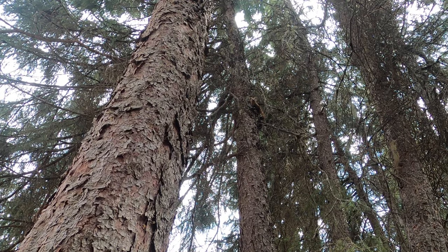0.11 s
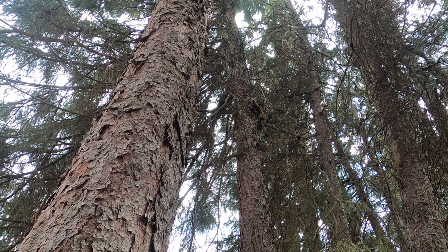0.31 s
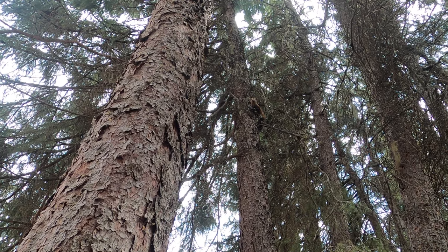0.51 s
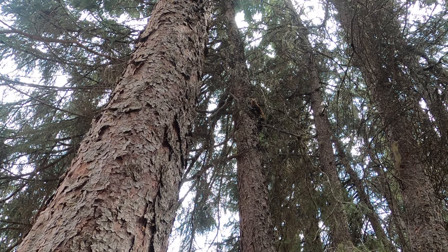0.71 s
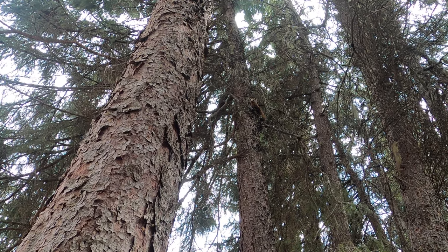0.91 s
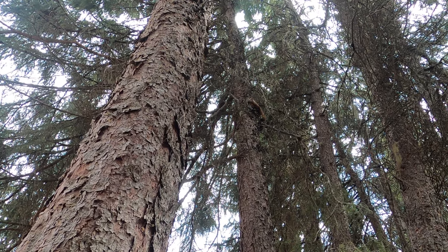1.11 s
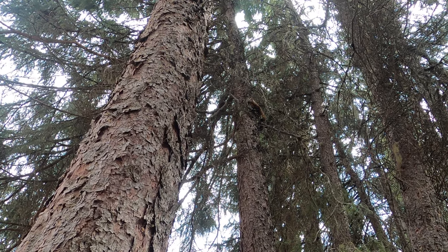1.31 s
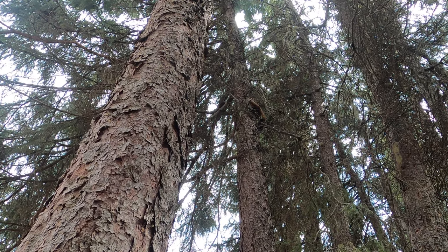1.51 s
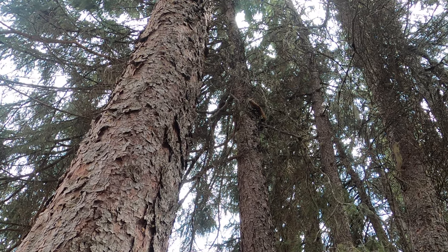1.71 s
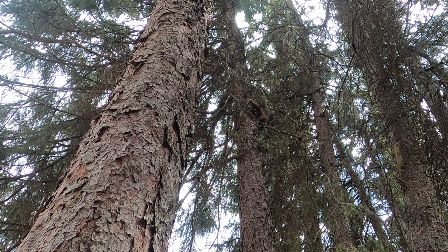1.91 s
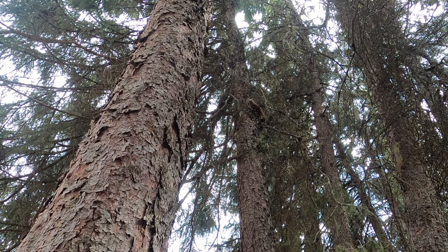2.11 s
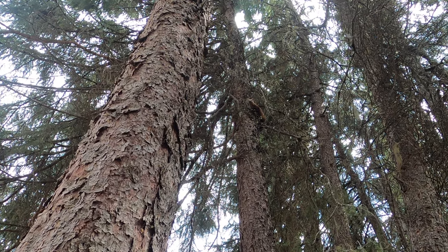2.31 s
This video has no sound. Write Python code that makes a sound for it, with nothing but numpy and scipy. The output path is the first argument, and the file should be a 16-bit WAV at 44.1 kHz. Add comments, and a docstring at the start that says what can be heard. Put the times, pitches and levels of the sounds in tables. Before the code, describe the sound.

Wind buffets the microphone in low, irregular rumbles, mostly on the right, building from about 0.3 seconds, strongest from 0.8 to 1.8, and easing after a last gust near 2.1. A faint steady hiss of conifers and soft needle rustles lies behind. A dry twig ticks at 0.3 seconds, with fainter ticks later. A small bird chips quietly near 0.5 and 1.7 seconds.

```python
"""Wind on a microphone among conifers

Gusts carry eddies past the two ports of a microphone, mostly the right one: low, irregular rumbles.
Behind them wind hisses steadily in tall conifers and nearer needles brush in soft, sizzling swells.
A few dry twigs or bits of bark tick, and a small bird chips twice among the trunks."""
import sys
import numpy as np
from scipy import signal
from scipy.fft import rfft, irfft, next_fast_len
from scipy.io import wavfile
from scipy.ndimage import uniform_filter1d, map_coordinates

SR = 44100
rng = np.random.default_rng(int(sys.argv[2]) if len(sys.argv) > 2 else 0)


def persist_wave(psi):
    """Save psi, clipped to +-1, as 16-bit WAV."""
    counts = np.round(np.clip(psi, -1, 1) * 32767).astype(np.int16)
    wavfile.write(sys.argv[1], SR, np.atleast_2d(counts).T)


N = 103635

# Spectrum of needle sizzle and twig crackle. Each row: frequency in Hz, relative density in dB.
CRACKLE_SPECTRUM = [(1500, -12), (4000, 5), (6500, 4), (9000, -3.5), (12000, -12.5), (13200, -21),
                    (14200, -31)]


def amp(db):
    """Decibels to gain."""
    return 10 ** (np.asarray(db) / 20)


def unit(x):
    """Scale to rms 1."""
    return x / np.sqrt(np.mean(x ** 2) + 1e-20)


def along(points, hz):
    """Interpolate (Hz, value) points on a log frequency axis."""
    knots_hz, values = np.transpose(points)
    return np.interp(np.log(hz + 1), np.log(knots_hz + 1), values)


def curve(points):
    """Interpolate (seconds, value) points at every sample."""
    return np.interp(np.arange(N) / SR, *np.transpose(points))


def wobble(rate_hz):
    """Smooth random curve, rate_hz knots a second."""
    knots = rng.standard_normal(int(N * rate_hz / SR) + 4)
    return map_coordinates(knots, [np.arange(N) * rate_hz / SR])


def filtered(x, response):
    """Zero-phase filter with gain response(hz)."""
    size = next_fast_len(N + SR // 2)
    return irfft(rfft(x, size) * response(np.fft.rfftfreq(size, 1 / SR)), size)[..., :N]


def noise(spectrum):
    """Two independent coloured noises of rms 1."""
    return unit(filtered(rng.standard_normal((2, N)), lambda hz: amp(along(spectrum, hz))))


def panned(pan_db):
    """Stereo gains of mean power 1; pan is left minus right."""
    gains = amp(np.array([[.5], [-.5]]) * pan_db)
    return gains / np.sqrt(np.mean(gains ** 2, axis=0))


def forest_echo(x, t60_s=.48, build_s=.015):
    """Trunks scatter sound into a diffuse tail that builds, then dies away."""
    t = np.arange(SR // 2) / SR
    tail = rng.standard_normal((2, len(t))) * amp(-60 * t / t60_s) * (1 - np.exp(-t / build_s))
    return signal.fftconvolve(x.mean(axis=0)[None], tail / np.linalg.norm(tail[0]), axes=1)[:, :N]


def conifers(level_db=-57.5, waver_db=.3):
    """Wind in the crowns: a steady, slightly wavering rush, wider in the treble."""
    # Each row: frequency in Hz, relative density in dB.
    spectrum = [(25, -8), (100, 3), (250, -9), (450, -9), (700, -6.5), (880, -7), (1050, -1), (1500, -1),
                (2100, -2.5), (3000, -7.5), (3700, -11.5), (4200, -14.5), (5200, -17.5), (7000, -28),
                (9000, -41.5), (14000, -70)]
    # Each row: frequency in Hz, left-right correlation.
    correlation = [(100, 0.93), (500, 0.69), (1200, 0.79), (2500, 0.65), (4500, 0.38), (9000, 0.11)]
    # Each row: frequency in Hz, pan in dB.
    pans = [(300, -2), (700, -1), (1400, 1.3), (2800, 3.5), (5000, -0.5), (9000, 1)]

    def mid_side_gains(hz):
        angle = np.arccos(along(correlation, hz)) / 2
        return np.array([np.cos(angle), np.sin(angle)])

    mid, side = filtered(noise(spectrum), mid_side_gains)
    crowns = unit(np.array([mid + side, mid - side])) * amp(level_db + waver_db * wobble(rate_hz=14))
    return filtered(crowns, lambda hz: panned(along(pans, hz)))


def needles(floor_db=-100.5, grain_db=3):
    """Needles on nearby branches brush together in soft, grainy swells."""
    # Each row: peak time in seconds, level in dB, width in seconds.
    rustles = [(.15, -75.5, .13), (.265, -70.5, 0.039), (.39, -78, 0.14), (0.619, -80, 0.087),
               (.81, -78.5, .05), (.97, -83, .05), (1.17, -79.5, .07), (1.6, -78, .06), (1.92, -88, 0.072),
               (2.249, -78, 0.069)]
    t = np.arange(N) / SR
    power = sum(amp(db) ** 2 * np.exp(-((t - peak_s) / width_s) ** 2) for peak_s, db, width_s in rustles)
    grain = amp(grain_db * np.array([wobble(rate_hz=600) for _ in range(2)]))
    return np.sqrt(amp(floor_db) ** 2 + power) * unit(noise(CRACKLE_SPECTRUM) * grain)


def twigs(hold_s=.001, crackle_t60_s=.019, echo_db=-10.5):
    """Dry twigs tick: milliseconds of crackle plus the ring of the wood."""
    # Each row: start in seconds, crackle level in dB, pan in dB, ring level in dB.
    ticks = [(0.264, -57.5, 15, -53), (.835, -67.5, 4.5, -82), (1.146, -75, -7, -99), (1.607, -67, 8, -86),
             (2.242, -69, 10, -87.5)]
    # Each row: frequency in Hz, dB relative to the ring level, T60 in seconds.
    modes = [(5170, -6, 0.028), (8770, -5.5, 0.016), (9000, -6.5, .016)]
    direct = np.zeros((2, N))
    for start_s, crackle_db, pan_db, ring_db in ticks:
        t = np.arange(N) / SR - start_s
        decay_s = np.maximum(t - hold_s, 0)
        crackle = noise(CRACKLE_SPECTRUM) * amp(crackle_db - 60 * decay_s / crackle_t60_s)
        ring = sum(amp(ring_db + db - 60 * decay_s / t60_s) * np.sin(2 * np.pi * hz * t)
                   for hz, db, t60_s in modes)
        direct += (crackle + ring) * (t > 0) * panned(pan_db)
    return direct + amp(echo_db) * forest_echo(direct)


def whistle(progress, hz):
    """Pure tone on a pitch curve, swelling and fading as progress runs from 0 to 1."""
    return np.sin(2 * np.pi * np.cumsum(hz) / SR) * np.sin(np.pi * progress)


def bird(note_s=.021, arch_hz=495, lead_s=.022, lead_db=-19.5):
    """Each chip: a thin rising slide, then a short arched note, echoed by the trunks."""
    # Each row: note start in seconds, level in dB, top pitch of the note in Hz.
    chips = [(.4630, -55.5, 3925), (1.6537, -54, 4000)]
    lead_from_hz, lead_to_hz = 4200, 7200
    t, song = np.arange(N) / SR, np.zeros(N)
    for start_s, db, top_hz in chips:
        note_progress = np.clip((t - start_s) / note_s, 0, 1)
        note = whistle(note_progress, top_hz - arch_hz * (2 * note_progress - 1) ** 2)
        lead_progress = np.clip((t - start_s) / lead_s + 1, 0, 1)
        lead = whistle(lead_progress, lead_from_hz + (lead_to_hz - lead_from_hz) * lead_progress)
        song += amp(db) * np.sqrt(2) * (note + amp(lead_db) * lead)
    direct = song * panned(pan_db=10.5)
    return direct + forest_echo(direct)


def eddies(speed, evenness=.35, mic_highpass_hz=30):
    """Frozen turbulence carried past one port: faster air makes faster pressure swings."""
    # Each row: frequency in Hz at speed 1, relative density in dB.
    spectrum = [(10, -14.5), (22, -4), (40, 1.5), (65, -1.5), (95, -4.5), (130, -11), (175, -19.5),
                (230, -30), (320, -49), (600, -93)]
    rumble_cutoff_hz = 223.4  # at speed 1; steep low-pass keeps the levelled rumble deep
    analytic = signal.hilbert(noise(spectrum)[0])
    pattern = analytic.real / (np.abs(analytic) + .3) ** evenness  # partly levels the envelope
    pattern = filtered(pattern, lambda hz: 1 / np.sqrt(1 + (hz / rumble_cutoff_hz) ** 16))
    pressure = map_coordinates(pattern, [np.cumsum(speed)], order=3, mode="mirror")
    return unit(filtered(pressure, lambda hz: hz ** 3 / np.sqrt(hz ** 6 + mic_highpass_hz ** 6)))


def buffeting(gain_db=1.5, speed_jitter=.16, lee_speed_ratio=.93):
    """Gusts drive eddies onto both ports; the sheltered left one gets slower, mostly weaker air."""
    # Each row: time in seconds, level in dB before gain_db.
    gusts = [(0.0, -56.5), (0.06, -81), (0.17, -54), (0.19, -48), (0.26, -41.5), (0.33, -49), (0.35, -72),
             (0.37, -41), (0.4, -69), (0.42, -37), (0.51, -34.5), (0.52, -35), (0.55, -60), (0.58, -46),
             (0.61, -69), (0.69, -37), (0.71, -42), (0.73, -38.5), (0.76, -53), (0.78, -33), (0.8, -31.5),
             (0.83, -34), (0.86, -30.5), (0.91, -33.5), (0.94, -54), (0.99, -31), (1.03, -52), (1.1, -34),
             (1.13, -52.5), (1.16, -35.5), (1.18, -52.5), (1.2, -40.5), (1.31, -46.5), (1.36, -40),
             (1.37, -34), (1.4, -58), (1.43, -34.5), (1.48, -48), (1.5, -37.5), (1.58, -37.5), (1.6, -32),
             (1.67, -38), (1.69, -70.5), (1.73, -34), (1.75, -37.5), (1.78, -56.5), (1.82, -34.5),
             (1.87, -51), (1.92, -53), (1.94, -45), (2.05, -36.5), (2.09, -37), (2.14, -69), (2.28, -74),
             (2.33, -46.5), (2.35, -51)]
    # Each row: time in seconds, relative air speed before jitter.
    air_speeds = [(0, 0.61), (.2, 0.67), (.28, 0.93), (.33, 0.58), (.37, 1.107), (.43, 0.9), (.5, .62),
                  (.58, .5), (.67, 0.45), (.71, 0.87), (.75, 0.57), (.79, 1.456), (.9, 1.31), (.95, 0.69),
                  (.99, 1.076), (1.04, 1.145), (1.09, 1.17), (1.15, 0.72), (1.23, 0.99), (1.29, 0.42),
                  (1.37, 0.52), (1.42, .6), (1.46, 1.44), (1.49, 1.81), (1.52, .85), (1.56, 1.204),
                  (1.61, 0.89), (1.66, 1.075), (1.7, 0.94), (1.74, 1.1), (1.8, 0.63), (1.93, 0.61),
                  (1.97, 1.02), (2.01, 0.46), (2.06, 0.83), (2.11, .45), (2.3, 0.65), (2.35, 0.85)]
    # Which port the wind hits. Each row: time in seconds, pan in dB.
    windward = [(0, 5.5), (.15, -6), (.25, -4), (.43, -10), (.5, -3.5), (.6, 1), (.69, -5), (.73, 5.5),
                (.8, -29.5), (.95, -18.5), (1.1, -19.5), (1.35, -13.5), (1.6, -18.5), (1.75, -16),
                (1.88, -7), (1.98, -15), (2.05, -17), (2.085, 7), (2.2, 9), (2.33, -5)]
    speed = curve(air_speeds) * np.exp(speed_jitter * wobble(rate_hz=45))
    ports = np.array([eddies(lee_speed_ratio * speed), eddies(speed)])
    level_db = uniform_filter1d(curve(gusts), size=300) + gain_db
    return amp(level_db) * ports * panned(curve(windward))


def scene(dip_at_s=1.684, dip_width_s=.008, dip_db=-9):
    """Buffeting over the forest; the level of crowns and bird dips once, briefly."""
    t = np.arange(N) / SR
    dip = amp(dip_db * np.exp(-((t - dip_at_s) / dip_width_s) ** 2))
    return buffeting() + (conifers() + bird()) * dip + needles() + twigs()


def record(dry, cutoff_hz=14800):
    """Brick-wall low-pass."""
    return filtered(dry, lambda hz: hz < cutoff_hz)


dry = scene()
out = record(dry)
persist_wave(out)
```